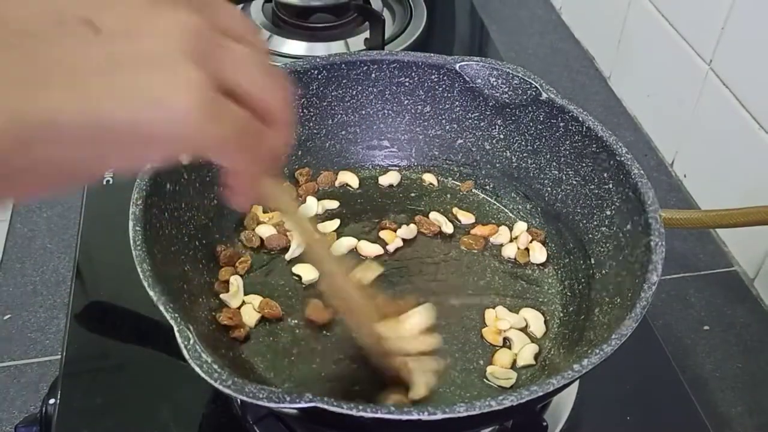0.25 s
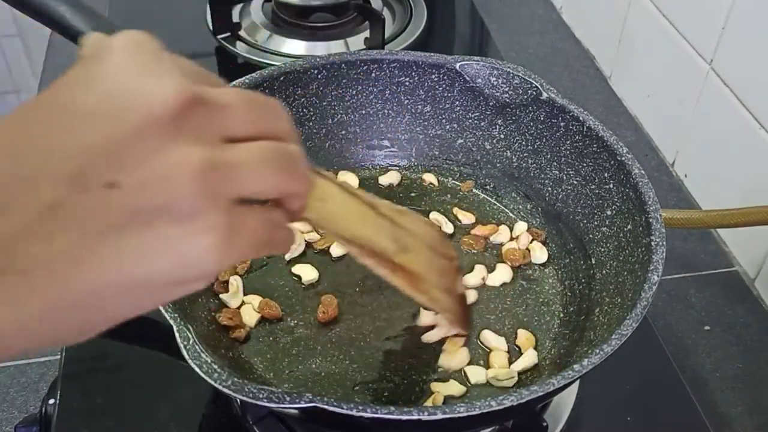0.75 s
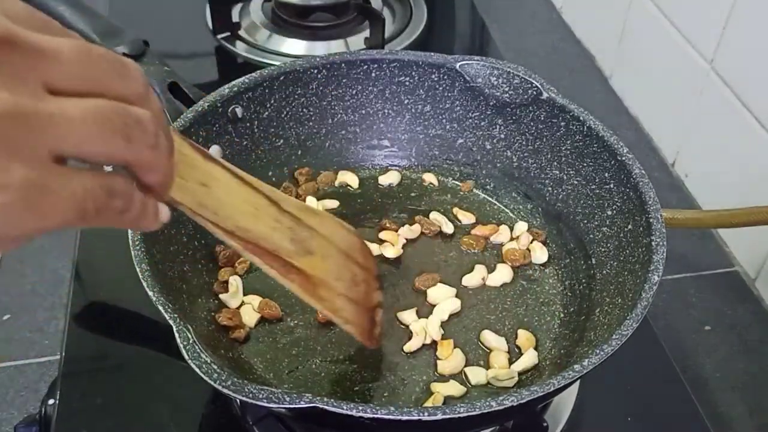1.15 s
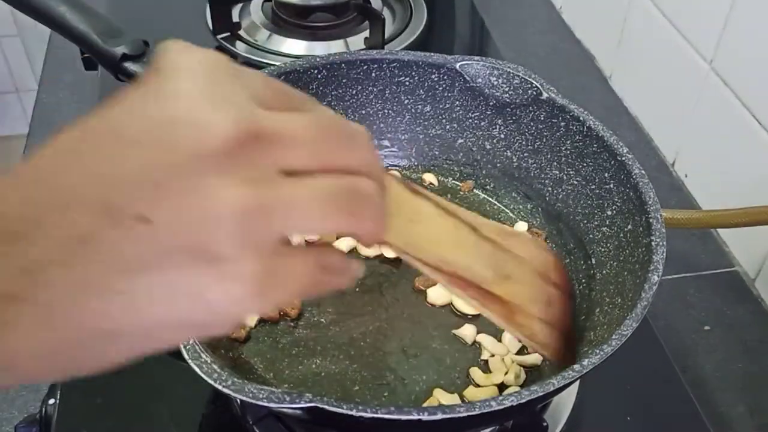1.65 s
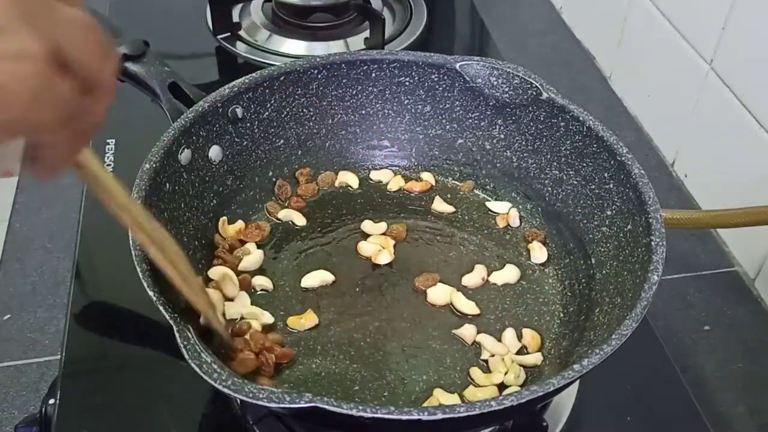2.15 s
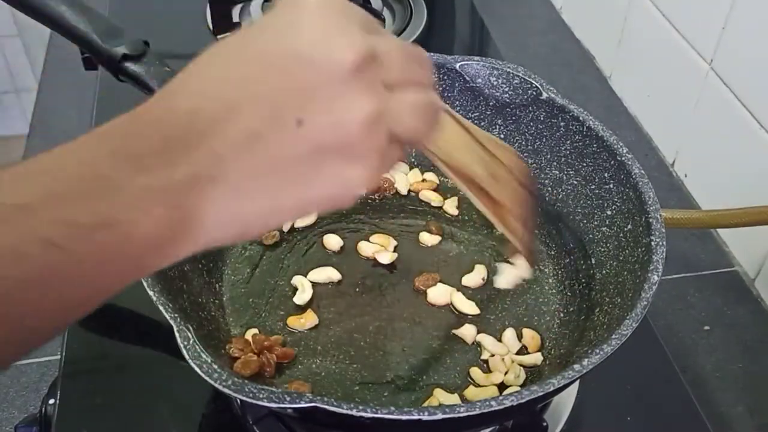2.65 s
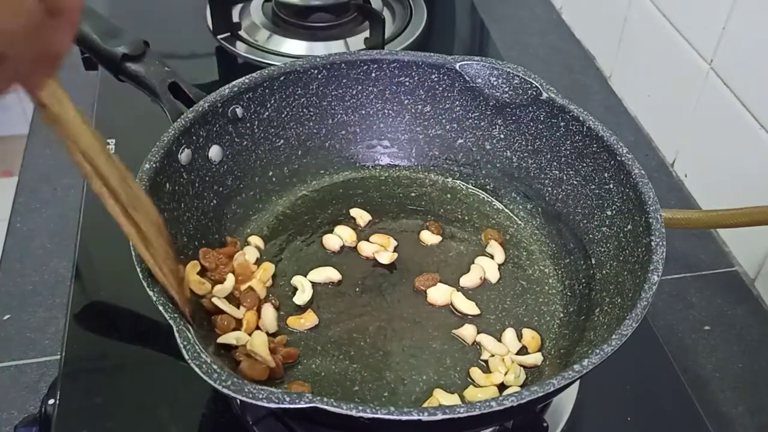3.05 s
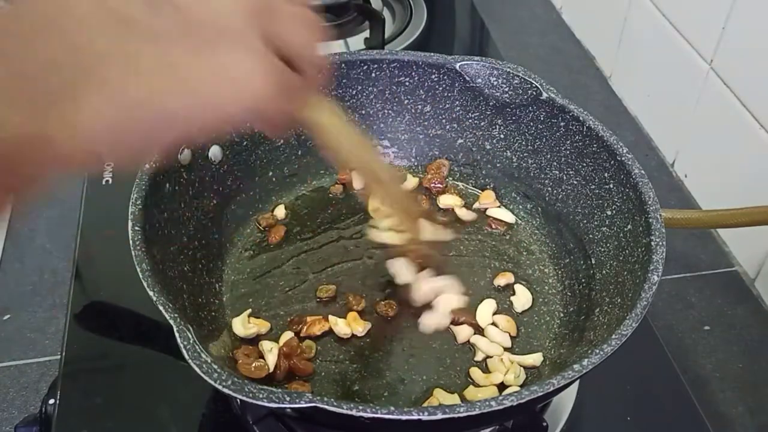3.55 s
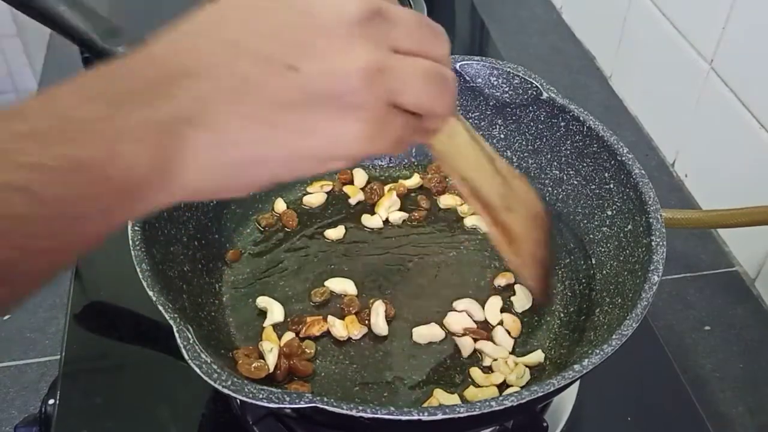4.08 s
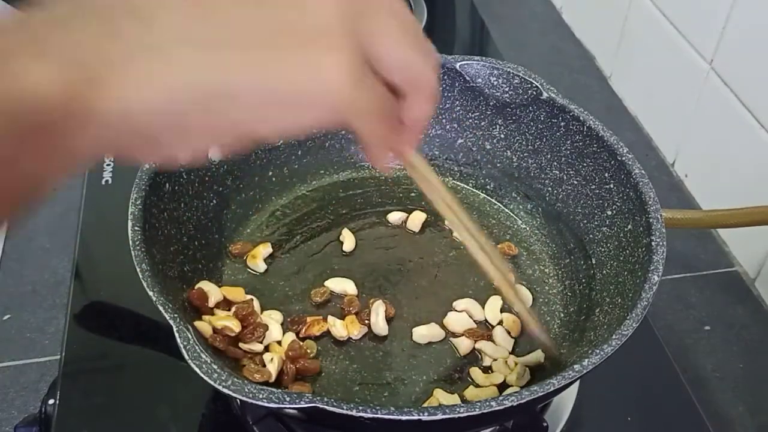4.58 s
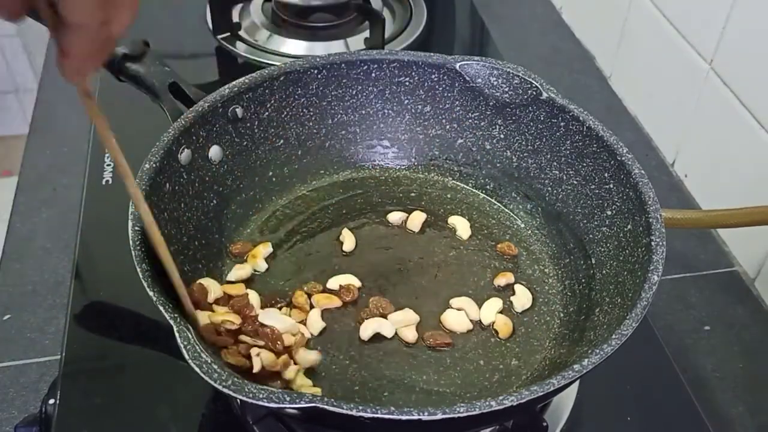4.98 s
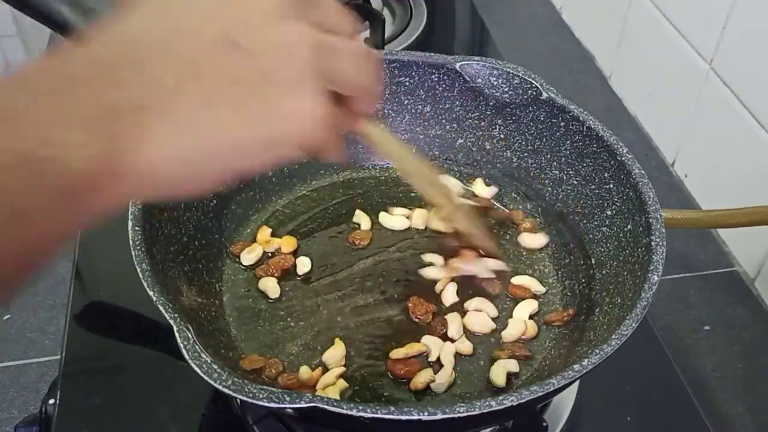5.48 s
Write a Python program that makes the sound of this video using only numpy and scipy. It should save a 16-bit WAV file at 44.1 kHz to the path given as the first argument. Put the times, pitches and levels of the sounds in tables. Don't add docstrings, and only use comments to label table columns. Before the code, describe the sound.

A wooden spatula knocks and scrapes in a deep pan while nuts tick and hot fat sizzles and pops, with two sharp metallic clinks early on.

```python
import sys
import numpy as np
from scipy import signal
from scipy.fft import rfft, irfft
from scipy.io import wavfile
from scipy.ndimage import uniform_filter1d

SR = 44100
rng = np.random.default_rng(int(sys.argv[2]) if len(sys.argv) > 2 else 0)


def voltage_ratio(level):
    return 10 ** (np.asarray(level, float) / 20)


def persist_wave(psi):
    counts = np.round(np.clip(psi, -1, 1) * 32767).astype(np.int16)
    wavfile.write(sys.argv[1], SR, np.atleast_2d(counts).T)


N = 252252

# (pitch [Hz], level [dB], t60 [s])
PAN_MODES = [(287, -18, 0.41), (328.6, -5.5, 0.068), (357, -24.5, 0.085), (451, -14.5, 0.26),
             (502.5, -3, 0.19), (560, -2.5, 0.24), (590.7, -4, 0.26), (624, -16.5, 0.043),
             (701.5, -6, 0.21), (776, -13, 0.29), (929, -7, 0.053), (1020, -8.5, 0.29), (1190, -4, 0.1),
             (1220, -7.5, 0.2), (1340, -19.5, 0.16), (1650, -8, 0.08), (1924, -12.5, 0.12),
             (2030, -14, 0.079), (2656, -14, 0.048), (2930, -18, 0.12), (3410, -13, 0.02),
             (4650, -13, 0.025), (5100, -14.5, 0.035), (5890, -10, 0.035)]
# (time [s], level [dB])
BOIL = [(0.0, -39), (0.4, -43), (0.78, -48), (1.0, -47), (1.81, -48.5), (2.04, -40.5), (2.28, -41.5),
        (2.55, -45), (2.75, -41), (3.08, -44.5), (3.25, -41.5), (3.73, -41), (4.2, -45.5), (4.41, -40.5),
        (4.62, -45), (5.08, -45), (5.19, -40.5), (5.72, -42)]
FLAT = [(1, 0), (2, 0)]


def evened(x):
    return x / np.sqrt(np.mean(x ** 2) + 1e-20)


def peaked(x):
    return x / abs(x).max()


def read(points, hz):
    f, value = np.transpose(points)
    return np.interp(np.log(hz + 1), np.log(f + 1), value)


def curve(rows):
    s, db = np.transpose(rows)
    return voltage_ratio(np.interp(np.arange(N) / SR, s, db, -120, -120))


def add(mix, s, sound):
    part = mix[round(s * SR):][:len(sound)]
    part += sound[:len(part)]


def coloured(x, points, lo_hz=0, hi_hz=22000):
    hz = np.fft.rfftfreq(len(x), 1 / SR)
    band = 1 / np.sqrt((1 + (lo_hz / (hz + 1)) ** 8) * (1 + (hz / hi_hz) ** 8))
    return evened(irfft(rfft(x) * voltage_ratio(read(points, hz)) * band, len(x)))


def sparks(per_s, spread_db):
    size = voltage_ratio(spread_db * np.minimum(rng.exponential(1, N), 4)) * rng.choice([-1, 1], N)
    return size * (rng.random(N) < per_s / SR)


def ring(modes, gains=0.89, damp=0.65, split=0.02):
    hz, db, t60 = np.transpose(modes)[:, :, None]
    t = np.arange(SR // 3) / SR
    detune = rng.uniform(-0.83, 1, (4, len(modes), 1)) * [[[.2]], [[1]], [[1]], [[2]]]
    phase = 2 * np.pi * hz * (1 + split * detune) * t
    lines = (np.sin(phase.astype(np.float32)) * [[[1]], [[.6]], [[.6]], [[.4]]]).sum(0)
    return (gains * voltage_ratio(db - 60 * t / (damp * t60)) * lines).sum(0)


def thud(modes, t60=0.066):
    t, tone = np.arange(SR // 3) / SR, np.asarray(modes)[:, :2]
    noise = coloured(rng.standard_normal(len(t)), tone, 0.64 * tone[0, 0], 1.454 * tone[-1, 0])
    return noise * voltage_ratio(-60 * t / t60)


def contact(ms, size):
    return 1 - np.exp(-np.arange(size) * 1000 / SR / max(ms, .05))


def bounced(sound, ms, share):
    return signal.lfilter(np.r_[1, np.zeros(round(ms * SR / 1000)), share], 1, sound)


def knocks():
    # (time [s], strength [dB], edge: treble over bass [dB], struck spot [Hz])
    blows = [(0.009, -30.5, -2, 516), (0.168, -44, 21, 1970), (0.243, -22, -16, 1080),
             (0.337, -29.5, -16, 554), (0.470, -22, -21, 596), (0.519, -29, -18, 522),
             (0.599, -29.5, -22, 1150), (0.711, -43.5, 5, 1760), (0.764, -37, -3, 560),
             (1.362, -17.5, -12, 575), (1.705, -25.5, -10, 450), (1.988, -46.5, 9, 1180),
             (2.458, -42.5, 7, 1620), (2.628, -8.5, -14.5, 506), (2.784, -16.5, -10.5, 645),
             (3.233, -27, -7.5, 724), (3.505, -24, -41, 480), (3.577, -28.5, -25, 560),
             (3.807, -42, 20.5, 1650), (3.884, -22.5, -4.5, 1320), (4.161, -16, -33, 480),
             (4.234, -31.5, 0, 550), (4.34, -52, 15, 1300), (4.439, -40, 8, 372), (5.021, -41.5, 16, 420),
             (5.049, -29, 0.5, 439), (5.427, -17.5, -30, 470), (5.599, -37.5, -1, 1020)]
    overtone = 2.28
    out, pan = np.zeros(N), np.array(PAN_MODES)
    hz = pan[:, 0]
    low, middle, high = hz < 900, (hz > 900) & (hz < 2500), hz > 2500
    for s, db, edge_db, spot_hz in blows:
        spot = .2
        for near_hz in (spot_hz, overtone * spot_hz, spot_hz / overtone):
            spot = spot + 1 / (1 + (np.log(hz / near_hz) / .2) ** 2)
        middle_db = -1.5 + 0.39 * edge_db + 6.5 * (spot_hz > 900)
        for part_db, group in (0, low), (middle_db, middle), (edge_db + 2, high):
            sound = peaked(ring(pan[group], spot[group, None])) + 0.96 * peaked(thud(pan[group], 0.072))
            sound = bounced(sound * contact(0.95, size=len(sound)), 15.0, 0.37)
            add(out, s, voltage_ratio(db + part_db) * peaked(sound))
    return out


def hard_blows():
    # (time [s], peak [dB], crack share, contact [ms], crack t60 [s], spread of the split lines)
    rim_blow = [
        (3.0783, -4.5, 0.65, 0.35, 0.11, .006),
    ]
    wall_blow = [
        (4.653, -8.5, 0.6, 0.54, 0.17, .012),
    ]
    clink_blow = [
        (0.7983, -2.2, 0.39, 0.55, 0.039, .006),
    ]
    clank_blow = [
        (1.0602, -5.5, 0.6, .3, 0.035, .02),
    ]
    # (pitch [Hz], level [dB], t60 [s])
    rim, wall = [(460, -11.5, 0.094), (787, -16, 0.54), (910, -13, 0.22), (1196, -5, 0.13),
                 (1690, -12, 0.25), (2929, -11, 0.4), (4400, 1.5, 0.035), (4651, -16, 0.26),
                 (4958, -2, 0.14), (5082, -10, 0.18), (5430, -7.5, 0.15), (5916, -1.5, 0.25),
                 (6331, -12, 0.2), (7025, -11, 0.4), (7600, -11, 0.28), (8340, -4, 0.08), (9010, -8, 0.19),
                 (9400, -18, 0.18)], [(280, -3.5, 0.31), (362.4, 0, 0.34), (510, -2.5, 0.88), (585.5, 1.5, 0.59),
                              (786, -6, 0.3), (909, -4, 0.11), (1180, -8.5, .1), (1172, 0, .1),
                              (1284, -4, .1), (1600, -10, 0.1), (2220, -12, 0.092), (3580, -23, .05),
                              (5170, -16.5, .08)]
    clink, clank = [(560, 2, 0.053), (1080, 0, 0.073), (1696, 3, 0.036), (1783, 4, 0.055),
                    (2400, 0.5, 0.047), (2860, -4, 0.11), (4619, -5, 0.096), (4805, 10, 0.13),
                    (4940, -6, 0.12), (6300, -15.5, 0.069), (7276, 4, 0.065), (7665, -1, 0.089),
                    (9740, -2.5, 0.1), (11740, -8.5, 0.13)], [(1771, 0, 0.05), (2044, -1, 0.035), (2500, -5, .05), (3400, -14, 0.04),
                                   (4480, -2, 0.18), (4620, 6, 0.09), (4800, 10.5, 0.03), (4980, 0, 0.02),
                                   (6100, -24, 0.03), (7050, -4, 0.12), (7720, 6, 0.045), (9600, -7, .1),
                                   (11720, -13, .12)]
    # (delay [ms], level [dB])
    all_landings = [
        [(0, 0), (4.5, -1), (18, -18), (30, -15)],
        [(0, 0), (5.5, -9), (50, -22)],
        [(0, 0), (3, -6), (18, -14), (58, -22)],
        [(0, -13), (4, 0), (12.5, -10), (22, -16), (42, -13), (46, -15), (61, -15)],
    ]
    out = np.zeros(N)
    parts = (rim_blow, rim), (wall_blow, wall), (clink_blow, clink), (clank_blow, clank)
    for (blow, modes), landings in zip(parts, all_landings):
        s, db, crack, ms, crack_t60, split = blow[0]
        body = peaked(ring(modes, split=split)) + crack * peaked(thud(modes, crack_t60))
        body = body * contact(ms, size=len(body))
        sound = np.zeros(len(body))
        for delay_ms, landing_db in landings:
            add(sound, delay_ms / 1000, voltage_ratio(landing_db) * body)
        add(out, s, voltage_ratio(db) * peaked(sound))
    return out


def strokes():
    # (start [s], length [s], pressure [dB], grit: gritty over low drag [dB])
    moves = [(0, 0.58, -46, -4), (0.523, 0.32, -44, -14), (.82, 0.34, -48, 5), (1.71, 0.84, -53.5, 2),
             (2.602, 0.45, -53, 6), (3.098, 0.44, -40, -10), (3.84, .26, -32, -15),
             (4.247, 0.22, -42.5, 2.5), (4.616, 0.43, -38.5, -5), (5.10, .27, -33, -1),
             (5.396, 0.4, -41.5, -11)]
    rise, fall = .3, .55
    low, gritty = voltage_ratio(-51.5) * np.ones(N), voltage_ratio(-49.5) * np.ones(N)
    for s, length, db, grit_db in moves:
        u = np.arange(0, length, 1 / SR) / length
        press = np.clip(np.minimum(u / rise, (1 - u) / fall), 0, 1) ** 2
        add(low, s, voltage_ratio(db) * press)
        add(gritty, s, voltage_ratio(db + grit_db) * press)
    return low, gritty


def scrape():
    low, high = PAN_MODES[:15], PAN_MODES[15:21]
    grit = evened(sparks(900, 2.5)) + 0.73 * rng.standard_normal(N)
    drag = evened(signal.fftconvolve(grit, ring(low, damp=0.84) + 1.14 * thud(low))[:N])
    gritty = evened(signal.fftconvolve(grit, ring(high, damp=0.72) + 2.4 * thud(high))[:N])
    low_gain, gritty_gain = strokes()
    return voltage_ratio(-3.0) * low_gain * drag + voltage_ratio(-7.0) * gritty_gain * gritty


def stutters():
    # (time [s], length [s], level [dB], first pitch
    # [Hz], second pitch [Hz])
    slips = [(.627, .05, -36, 1900, 1500), (4.807, .048, -35, 1210, 1910), (3.095, .09, -36, 450, 280),
             (2.70, .075, -27, 570, 330), (.175, .05, -43, 2850, 1950), (.25, .08, -39, 1150, 2640),
             (2.86, .07, -35, 575, 520), (5.02, .04, -40, 4300, 2900), (5.14, .12, -33, 720, 1000),
             (.48, .06, -38, 280, 720), (1.72, .12, -42, 330, 500), (5.15, .12, -40, 1300, 1900),
             (5.15, .14, -36, 540, 1700), (3.81, .05, -38, 3300, 3650), (4.815, .04, -44, 2450, 1600),
             (5.05, .03, -41, 3500, 2900), (5.29, .03, -44, 2650, 1200), (2.79, .05, -36, 1250, 1650),
             (2.79, .09, -40, 8200, 5500), (4.16, .04, -36, 1050, 360), (3.082, .04, -33, 4450, 4700),
             (3.10, .11, -38, 2925, 5920), (0, .05, -38, 1030, 520), (3.505, .05, -33, 330, 440)]
    out = np.zeros(N)
    for s, length, db, first_hz, second_hz in slips:
        t = np.arange(0, length, 1 / SR)
        fuzz = uniform_filter1d(rng.standard_normal((2, 2, len(t))), round(9.0 * SR / first_hz))
        waver = .5 + .5 * (evened(fuzz[0]) + 1j * evened(fuzz[1]))
        held = np.real(waver * np.exp(2j * np.pi * t * [[first_hz], [second_hz]]))
        low_hz, high_hz = sorted((first_hz, second_hz))
        rub = coloured(rng.standard_normal(len(t)), FLAT, 0.74 * low_hz, 1.1 * high_hz)
        slip = (held[0] + 0.34 * held[1] + 0.27 * rub) * signal.windows.tukey(len(t), .4)
        add(out, s, voltage_ratio(db) * slip)
    return out


def rattle():
    # (time [s], level [dB])
    touches = [
        (.49, -60),
        (.53, -48),
        (.65, -36.5),
        (.69, -52),
        (.78, -54),
        (.82, -47),
        (.96, -42.5),
        (1.04, -42),
        (1.065, -55),
    ]
    # (pitch [Hz], level [dB], t60 [s])
    metal = [(1820, 5.5, 0.014), (4784, -4.5, 0.1), (7200, -4, 0.05), (9720, -11, .05), (11750, -15, .05)]
    return curve(touches) * evened(signal.fftconvolve(sparks(1500, 2.1), ring(metal, split=0.01))[:N])


def ticks():
    # (time [s], peak [dB],
    # pitch [Hz])
    taps = [(.116, -34, 1900), (.1675, -22, 2750), (.2428, -25, 2180), (.2648, -28, 1150),
            (.3282, -29, 8060), (.3721, -35, 4860), (.7622, -33, 1790), (.9827, -35, 1780),
            (1.0036, -32, 1800), (1.0261, -28, 1800), (1.3623, -26, 1670), (1.6132, -35, 15100),
            (1.8447, -38, 5070), (1.8746, -38, 1850), (1.8916, -33, 7980), (2.05, -37, 1200),
            (2.14, -36, 5160), (2.19, -38, 1650), (2.2648, -32, 5600), (2.6289, -24, 3900),
            (2.6983, -27, 15300), (2.7397, -26, 3300), (2.7846, -22, 1250), (2.829, -25, 8410),
            (2.857, -36, 3700), (2.9392, -34, 4590), (3.0031, -26, 8680), (3.186, -32, 3800),
            (3.2116, -29, 2630), (3.2316, -25, 8140), (3.3957, -26, 15200), (3.458, -27, 8660),
            (3.4979, -25, 7940), (3.506, -22, 500), (3.514, -28, 1300), (3.521, -24, 540),
            (3.558, -33, 1900), (3.8072, -18, 3200), (3.8072, -26, 5700), (3.8841, -23, 1810),
            (3.8841, -30, 3900), (4.2293, -31, 8130), (4.2363, -30, 1750), (4.337, -32, 1630),
            (4.4648, -26, 8180), (4.7027, -28, 1710), (5.0205, -27, 4300), (5.034, -30, 3800),
            (5.0494, -25, 3530), (5.07, -33, 2900), (5.142, -28, 620), (5.155, -33, 2200),
            (5.158, -29, 760), (5.172, -31, 1900), (5.1906, -23, 640), (5.1906, -30, 1660),
            (5.208, -28, 1200), (5.2939, -28, 8190), (5.4321, -28, 15100), (5.6416, -31, 4300)]
    # (pitch ratio, level [dB])
    tick_modes = [(1, 0), (.91, -7), (1.16, -8), (1.47, -12), (.66, -13)]
    out, t = np.zeros(N), np.arange(3000) / SR
    ratio, mode_db = np.transpose(tick_modes)[:, :, None]
    for s, db, hz in taps:
        fade = hz * t * (hz / 2000) ** .4 / 9.0
        tones = np.sin(2 * np.pi * np.minimum(ratio * hz, 15500) * t)
        modes = (voltage_ratio(mode_db) * tones).sum(0) * np.exp(-fade)
        snap = np.sin(2 * np.pi * hz * t) * np.exp(-hz * t)
        add(out, s, voltage_ratio(db) * peaked(peaked(modes) + .5 * peaked(snap)))
    return out


def spray():
    # (time [s], peak [dB])
    spits = [
        (.8, -37),
        (1.064, -29),
        (1.54, -50),
        (1.82, -46),
        (2.52, -40),
        (2.8, -44),
        (3.08, -43),
        (3.39, -38),
        (4.05, -47),
        (4.7, -50),
    ]
    boil, t = curve(BOIL), np.arange(SR // 4) / SR
    gain = voltage_ratio(-4) * boil.mean() * (boil / boil.mean()) ** 1.3
    for s, db in spits:
        add(gain, s, voltage_ratio(db - 60 * t / 0.093) * contact(4.0, size=len(t)))
    return gain


def sizzle():
    # (frequency [Hz], level [dB per Hz])
    fizz_tone = [(1180, -49), (2000, -20), (2460, -54), (2630, -16), (3230, -12.5), (3840, -8), (5270, -6),
                 (6640, -8), (7610, -2), (8150, 1), (9930, -7.5), (12000, -8), (14900, 3.5), (15500, 5.5)]
    fine_hz = 10800
    t, grains = np.arange(200) / SR, np.zeros(N)
    for hz in np.geomspace(3500, 15500, 24):
        clump = voltage_ratio(3.4 * evened(uniform_filter1d(rng.standard_normal(N), 1500)))
        grain = np.sin(2 * np.pi * hz * t) * np.exp(-hz * t / 3) * hz ** 1.5
        grains += signal.oaconvolve(sparks(140, 2.8) * clump, grain)[:N]
    fat = coloured(evened(grains) + 1.46 * rng.standard_normal(N), fizz_tone)
    low = coloured(fat, FLAT, hi_hz=fine_hz)
    fine = coloured(fat, FLAT, lo_hz=fine_hz)
    gusts = voltage_ratio(1.0 * evened(uniform_filter1d(rng.standard_normal(N), 2000)))
    return voltage_ratio(1.5) * curve(BOIL) * low + voltage_ratio(-0.5) * spray() * gusts * fine


def pops():
    # (time [s], peak [dB], pitch [Hz])
    bubbles = [(0.1331, -14, 14500), (0.1675, -26, 8140), (0.2276, -23, 8600), (0.3844, -27, 7810),
               (1.828, -21, 15100), (1.9994, -24, 7700), (2.2175, -26, 9840), (2.2268, -22, 9000),
               (2.2655, -17, 15000), (2.2874, -22, 15400), (2.334, -27, 8360), (2.3775, -27, 14800),
               (2.5294, -23, 14600), (2.7404, -21.5, 4910), (2.7892, -17, 7950), (3.022, -22.5, 8010),
               (3.044, -29, 8160), (3.2122, -23, 9400), (3.2574, -22, 8200), (3.3744, -15.5, 8240),
               (3.5517, -20.5, 8300), (3.6732, -7.5, 8120), (4, -22.5, 8000), (4.054, -22, 8600),
               (4.3335, -18, 15100), (4.584, -25, 9500), (5.021, -19.5, 7960), (5.2798, -22, 8690)]
    out, t = np.zeros(N), np.arange(1500) / SR
    for s, db, hz in bubbles:
        cycles = 2.15 + .08 * (db + 22)
        burst = np.sin(2 * np.pi * hz * t) * np.exp(-hz * t / max(cycles, .5)) * (1 - np.exp(-t / .0001))
        spatter = np.diff(rng.standard_normal(len(t) + 1)) * np.exp(-t / 0.0088)
        add(out, s, voltage_ratio(db) * (peaked(burst) + 0.053 * spatter))
    return out


def fan():
    # (frequency [Hz], level [dB per Hz])
    rumble = [(15, -40), (28, -19), (60, -8), (92, 8.5), (118, 6), (145, 5.5), (195, -11), (270, -4),
              (389, -3.5), (438, -19.5), (592, -15.5), (655, -13.5), (1220, -19.5), (1520, -30),
              (1710, -21), (2010, -24), (3000, -21.5), (3900, -51), (6600, -120)]
    swell = voltage_ratio(1.6 * evened(uniform_filter1d(rng.standard_normal(N), 6000)))
    return voltage_ratio(-45) * swell * coloured(rng.standard_normal(N), rumble)


def kitchen(x):
    # (frequency [Hz], t60 [s])
    decay = [(250, 0.56), (600, 0.65), (1500, 0.41), (4000, 0.41), (8000, 0.33), (14000, 0.28)]
    taps = np.zeros(SR)
    at = np.arange(150, SR - 20, 20)
    taps[at + rng.integers(0, 20, len(at))] = rng.choice([-1., 1.], len(at))
    hz, t, z = signal.stft(taps, SR, nperseg=256)
    tail = signal.istft(z * voltage_ratio(-60 * t / read(decay, hz)[:, None]), SR, nperseg=256)[1]
    return signal.fftconvolve(x, tail / np.linalg.norm(tail))[:N]


def scene():
    soft_wood = signal.butter(4, 7000, fs=SR, output="sos")
    small_pan = signal.butter(4, 220, "high", fs=SR, output="sos")
    blows = signal.sosfilt(soft_wood, knocks()) + hard_blows() + rattle() + ticks()
    slips, bursts = stutters(), pops()
    echoes = kitchen(voltage_ratio(-4.5) * blows + voltage_ratio(-10.0) * slips + voltage_ratio(-2.5) * bursts)
    pan = signal.sosfilt(small_pan, blows + slips + scrape() + echoes)
    mono = pan + bursts + sizzle() + fan()
    return np.array([mono, mono])


def roll_off(x):
    return signal.sosfilt(signal.butter(12, 16810, fs=SR, output="sos"), x)


def record(dry):
    # (time [s], length [s], lowest frequency [Hz], level [dB])
    splits = [
        (0, .03, 5500, -53),
        (1.06, .04, 4200, -32),
        (2.36, .06, 5200, -50),
        (2.59, .04, 11800, -52),
        (2.93, .04, 11000, -52),
        (3.36, .04, 13800, -53),
        (3.52, .06, 5200, -46),
        (3.66, .02, 4500, -42),
        (4.70, .06, 4800, -48),
        (5.26, .045, 13000, -46),
    ]
    edge_hz = 15520
    lowpass = signal.firwin(511, edge_hz, window=("kaiser", 8), fs=SR)
    kept = signal.oaconvolve(dry, lowpass[None], "same")
    loud = uniform_filter1d(abs(dry - kept), 200) > voltage_ratio(-40.0)
    gate = uniform_filter1d(uniform_filter1d(1. * loud, 300), 300)
    top = voltage_ratio(-19.0) * (dry - kept) * gate
    side = np.zeros(N)
    for s, length, lo_hz, db in splits:
        noise = coloured(rng.standard_normal(4096), FLAT, lo_hz, edge_hz)
        noise = coloured(noise, FLAT, lo_hz)[:round(length * SR)]
        add(side, s, voltage_ratio(db) * noise * np.hanning(len(noise)))
    return roll_off(kept + top + side * [[1], [-1]])


dry = scene()
out = record(dry)
persist_wave(out)
```